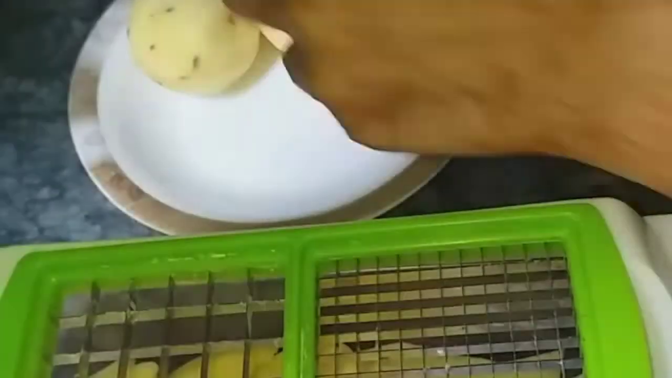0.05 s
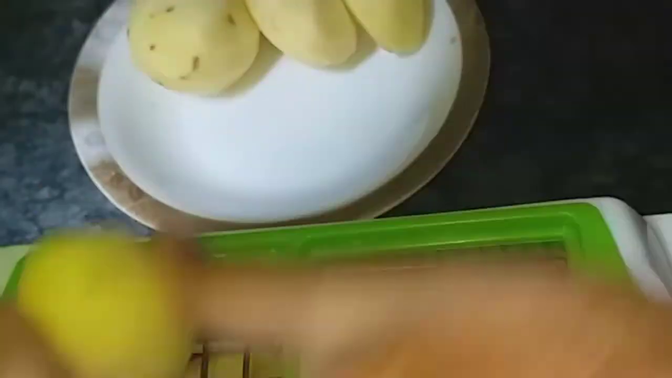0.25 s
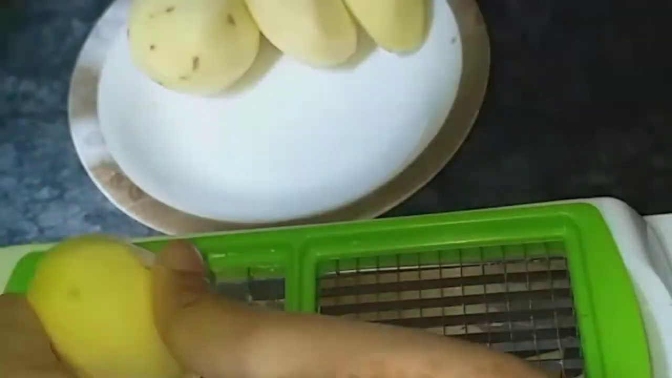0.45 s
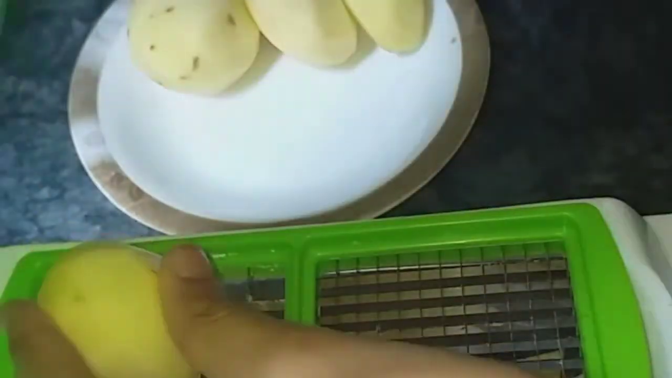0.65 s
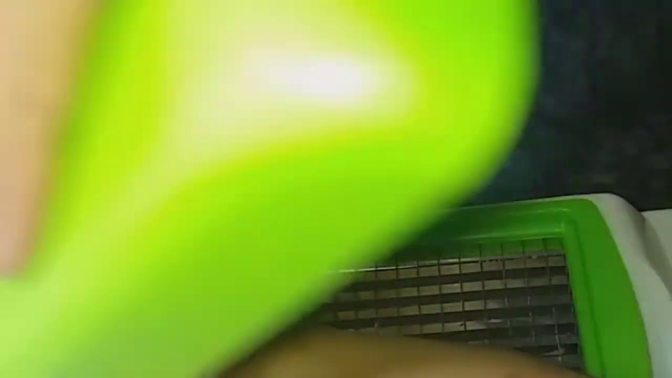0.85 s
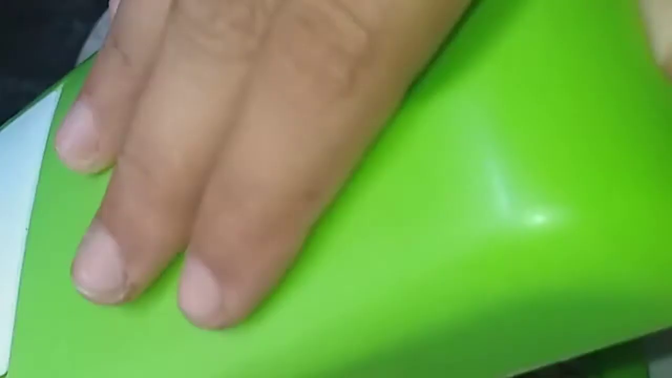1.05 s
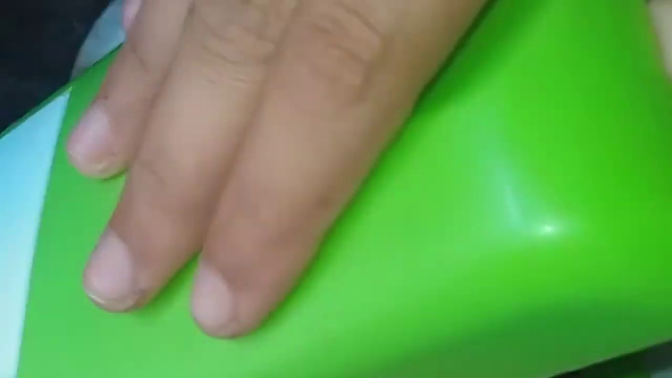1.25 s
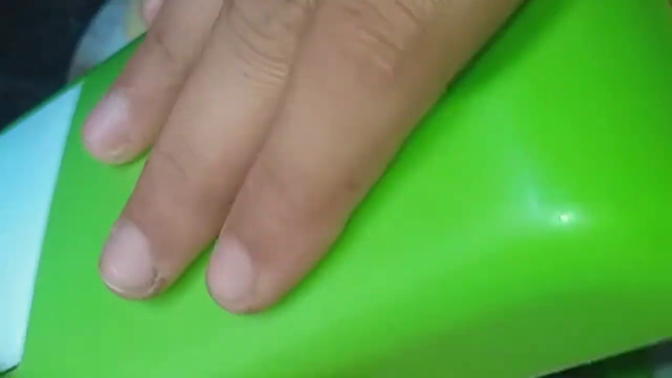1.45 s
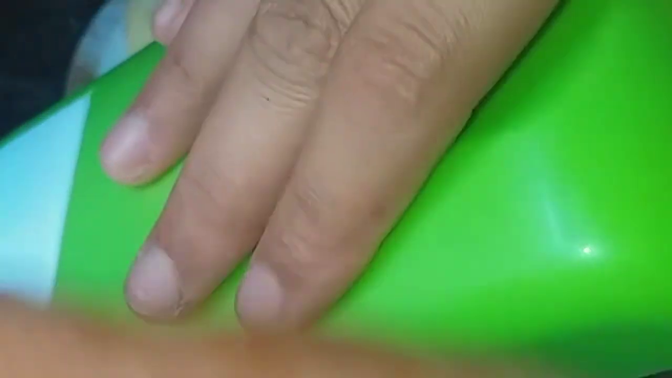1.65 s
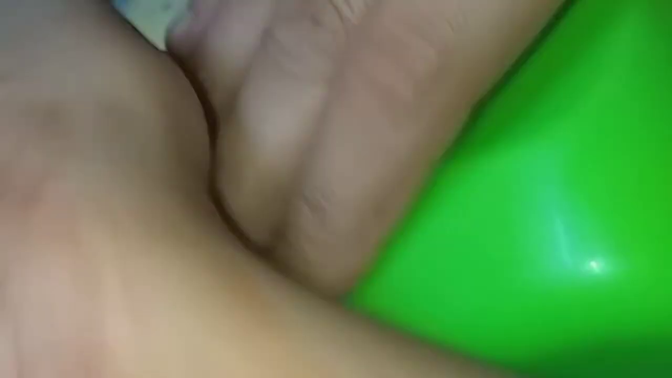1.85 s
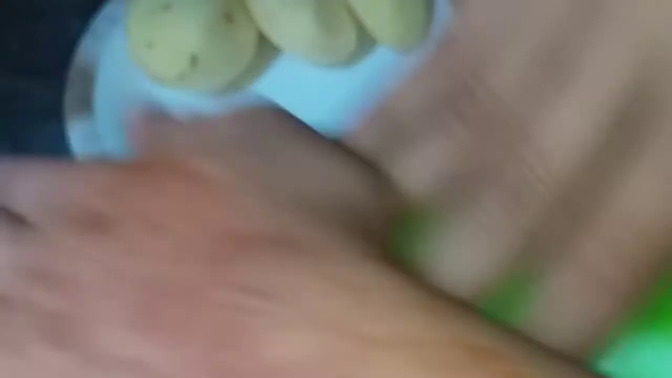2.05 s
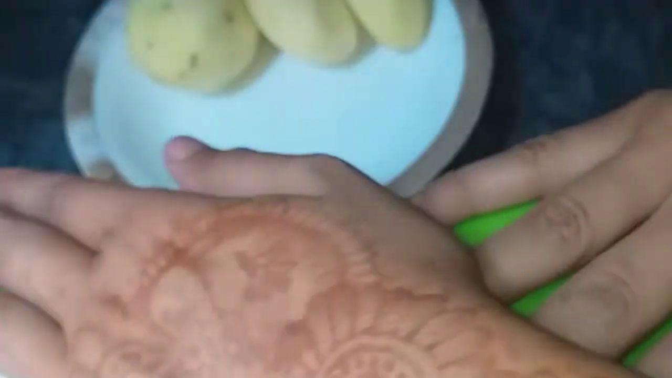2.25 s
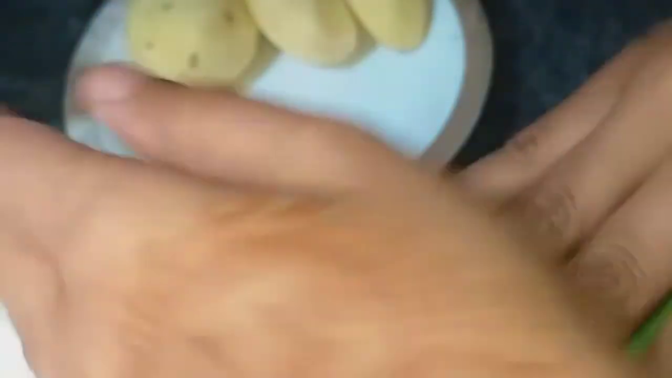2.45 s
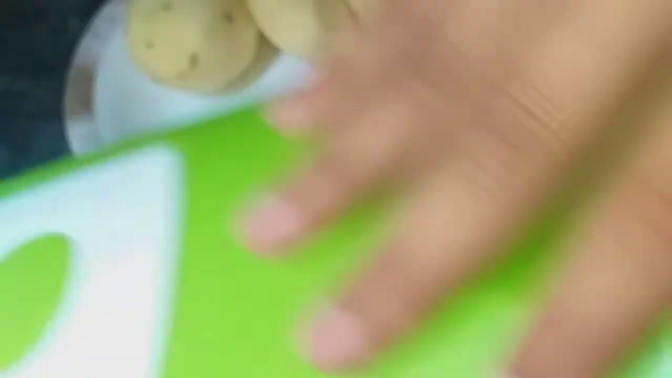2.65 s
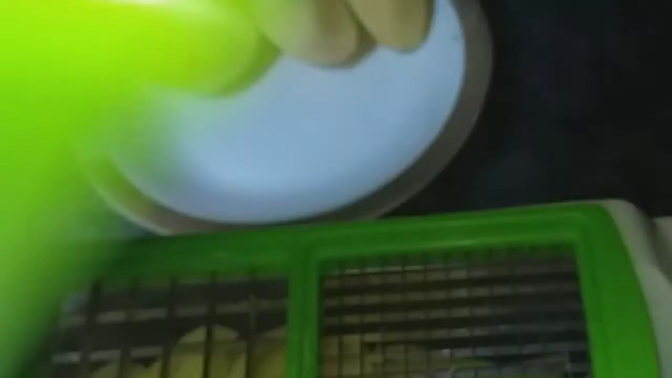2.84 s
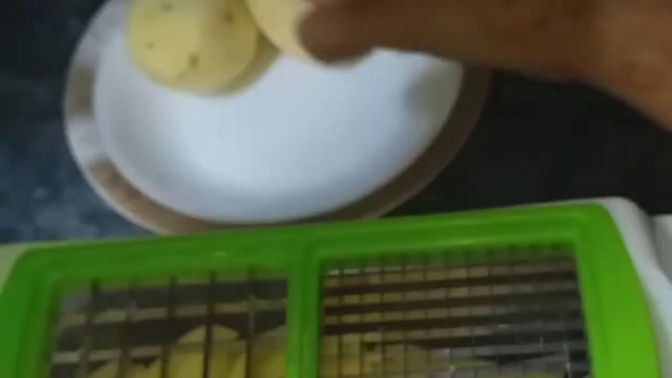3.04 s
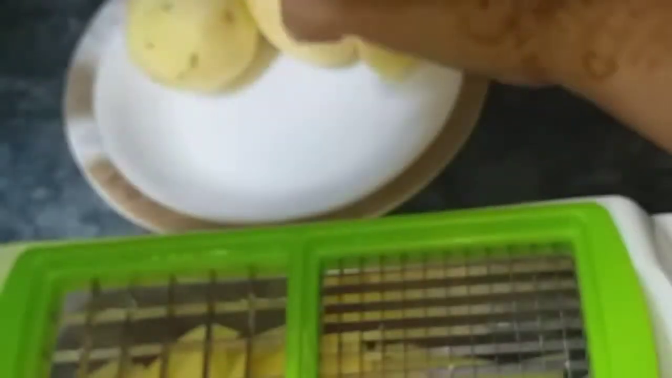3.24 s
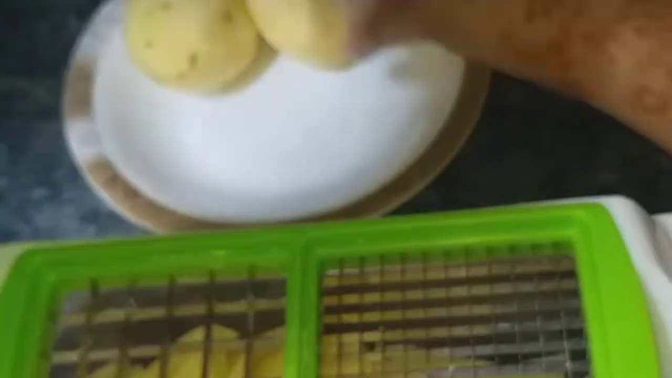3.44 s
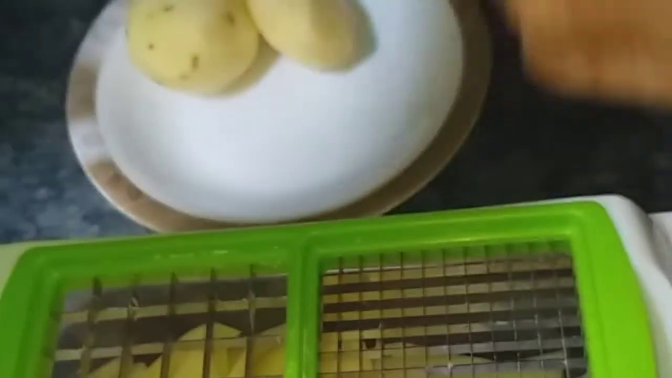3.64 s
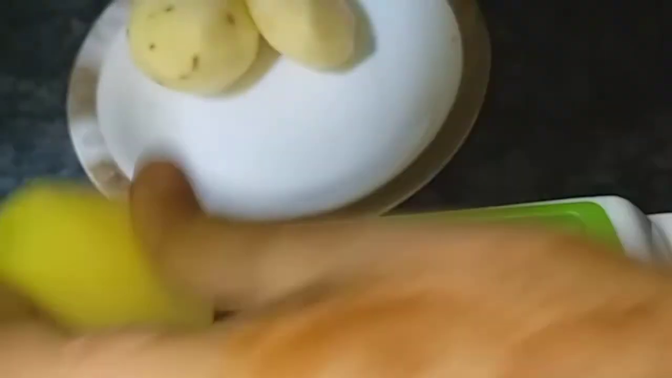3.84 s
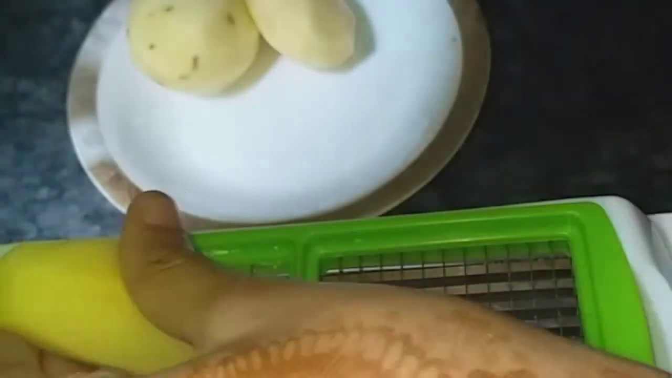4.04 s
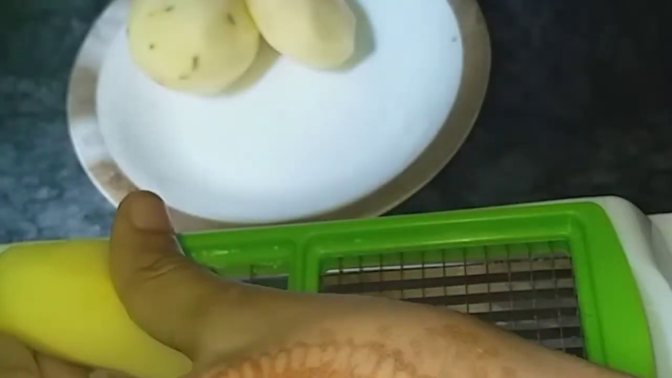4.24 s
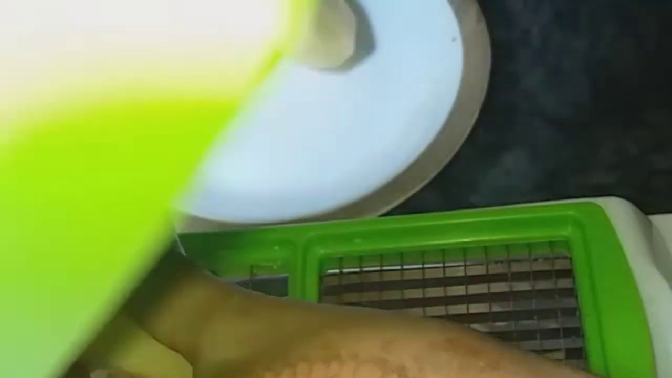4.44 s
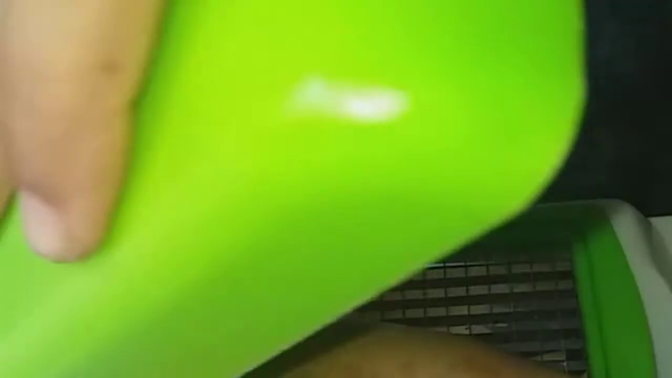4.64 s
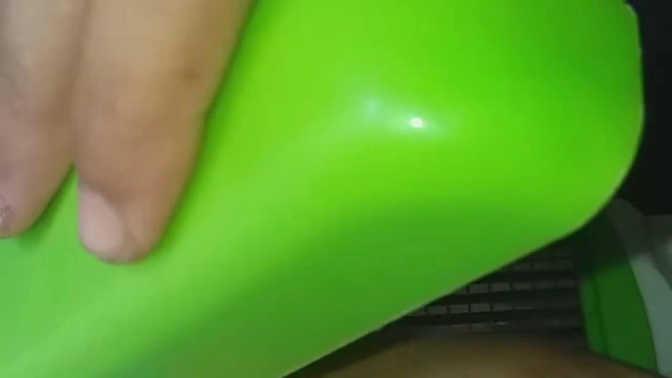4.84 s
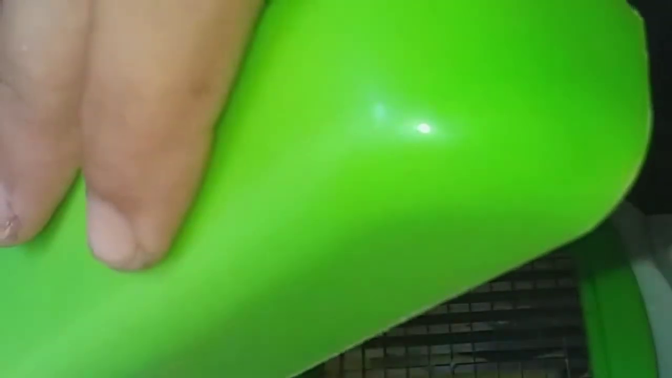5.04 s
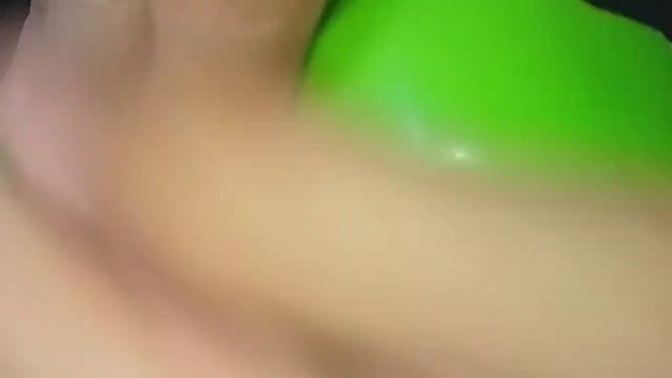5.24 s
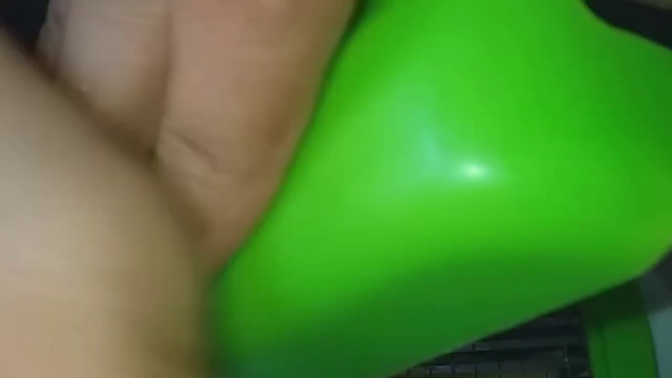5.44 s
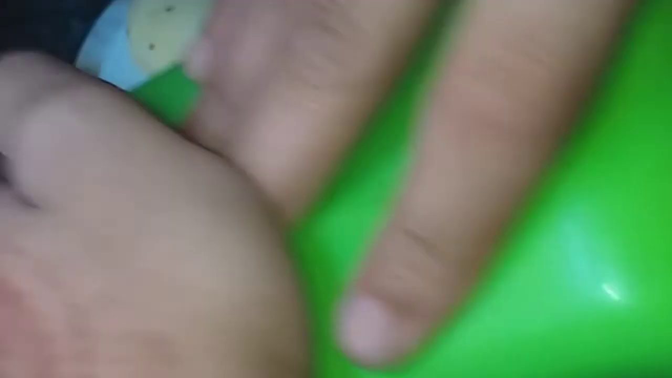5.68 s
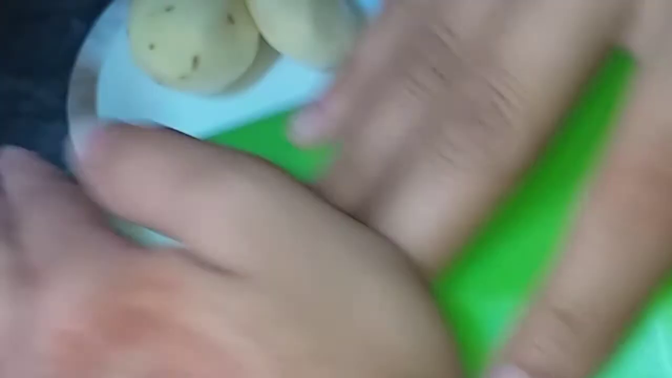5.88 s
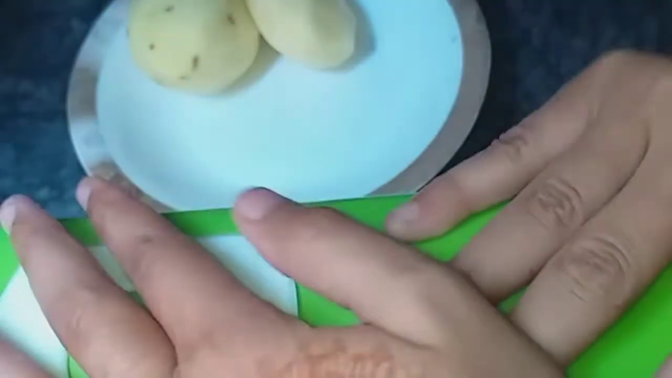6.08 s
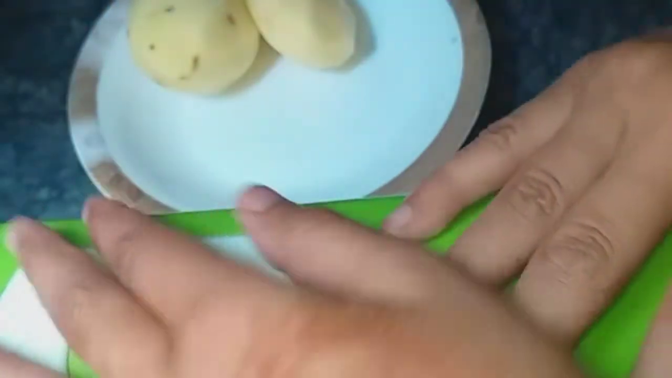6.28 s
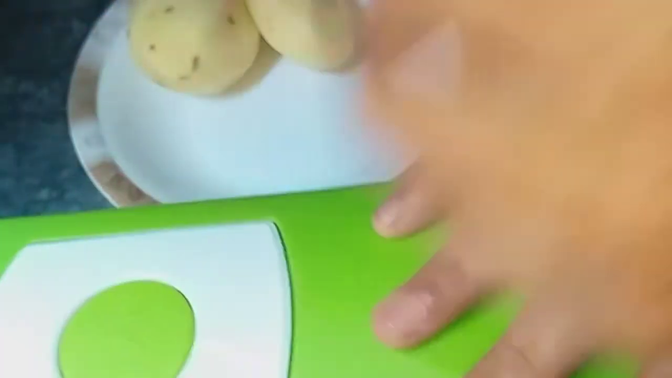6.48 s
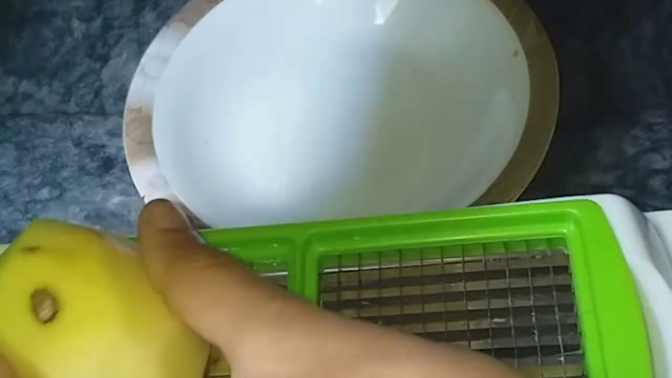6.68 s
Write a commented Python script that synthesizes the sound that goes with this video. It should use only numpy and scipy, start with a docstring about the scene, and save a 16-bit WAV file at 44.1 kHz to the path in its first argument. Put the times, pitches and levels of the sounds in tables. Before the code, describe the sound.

Close in a small, slightly echoing kitchen, quiet fan air with an unsteady low hum runs throughout, while a distant flock of small birds chatters and single chirps stand out. A tiny snap comes at 0.2 s, soft finger rubs and a faint tap before 0.6, then a clear plastic knock at 1.0 and light rattles to 1.6. From 1.9 to 2.15 s flesh tears with a gritty scrape, faint wet squeal and quick metallic twangs, ending in a loud hollow plastic slam with a short ring. Small clicks follow near 2.5, and the background sinks. Birds and hum fill 3 to 5.4 s, with a bright chirp at 5.4. At 5.53 a very sharp crack and low palm thump start a slower, faint crunch, with a snap at 5.66; the lid clacks shut hard at 6.03. Birds remain, and the fan drops at 6.54.

```python
"""Vegetable dicer and birds

On a kitchen counter the lid of a plastic dicer is laid on a potato, pressed through the blade grid and slams
shut, twice. Blows excite the resonances of lid and box, and cutting is a train of stick-slip impulses.
A fan hums (filtered noise), small birds chatter beyond a window (frequency-modulated tones), and the
background sinks after each slam."""
import sys
import numpy as np
from scipy import signal
from scipy.fft import rfft, irfft, next_fast_len
from scipy.io import wavfile
from scipy.ndimage import uniform_filter1d, minimum_filter1d, map_coordinates

SR = 44100
rng = np.random.default_rng(int(sys.argv[2]) if len(sys.argv) > 2 else 0)


def master(y):
    """Save y as 16-bit WAV."""
    cut = np.clip(np.atleast_2d(y).T, -1, 1)
    pcm = np.round(cut * 32767)  # scale
    wavfile.write(sys.argv[1], SR, pcm.astype(np.int16))


N = 295911
T = np.arange(N) / SR  # time in seconds

# moments at which the lid slams shut: start_s
SLAM_TIMES = (2.1515, 6.0306)
# modes of the shut lid on the box: pitch_hz, t60_s, first_slam_level_db, second_slam_level_db
LID_MODES = [(260, .1, -20.5, -19.5), (321, .09, -21.5, -17.5), (392.8, .13, -10.5, -34.5),
             (500, .13, -18, -30.5), (630.3, .09, -18.5, -22.5), (831, 0.098, -23, -20.5),
             (1554, 0.077, -19.5, -30), (2060, 0.1, -16, -32.5), (2580, .1, -23, -18)]
# the palm lands on the lid
PALM_START_S, PALM_DB, PALM_HZ, PALM_T60_S = 5.532, -24, 120, 0.027
# blades through the flesh, one list per press: time_s, groan_level_db, pressure_0_to_1, scrape_over_groan_db
CUTS = [
    [(1.955, -44, 0.12, -12.5), (2.0, -56.5, 0.04, -5.5), (2.035, -50.5, 0.06, 0), (2.065, -41, 0.07, -4),
     (2.085, -45.5, 0.23, 4), (2.11, -41, 0.16, 4.5), (2.145, -39.5, 0.3, 2)],
    [(5.545, -44, 0.02, -17.5), (5.62, -58.5, 0, -21.5), (5.66, -48.5, 0.2, -12), (5.71, -49, 0.8, -11.5),
     (5.785, -53, 0.23, -20), (5.81, -60, 0.4, -17.5), (5.88, -50.5, 0.8, -9), (5.96, -46.5, 0.7, 2),
     (6.022, -45.5, 0.67, -2.5)],
]
# wet blade squeal: time_s, level_db, pitch_hz
SQUEAL = [(1.96, -65, 4700), (1.99, -59.5, 5130), (2.03, -62, 5480), (2.09, -58.5, 5420), (2.13, -62, 5270)]
# forward jumps of the blade grid: start_s, level_db
GRID_JERKS = [(2.037, -29), (2.051, -34.5), (2.068, -33), (2.083, -24.5), (2.099, -28)]
GRID_HZ, GRID_T60_S, JERK_RISE_S = 1856, 0.045, 0.0015
# lid and box contacts: start_s, level_db, best_driven_pitch_hz, fall_off_db_per_octave_squared (sign ignored),
# rattle_t60_s
KNOCKS = [(.588, -57, 560, 9, 0.089), (1.044, -38.5, 800, 0, 0.067), (1.341, -55.5, 488, 27, 0.067),
          (1.375, -52.5, 428.5, 9, 0.035), (1.454, -53, 500, 10, 0.063), (1.639, -45.5, 1820, 0, 0.21),
          (1.931, -39.5, 539, 9.5, 0.045), (2.15, -13.5, 1200, 0.4, 0.15), (2.152, -15, 1810, 4.5, 0.081),
          (2.371, -52, 1470, -0.5, 0.028), (2.472, -45, 1970, 16, 0.025), (2.486, -38, 2140, 4, 0.029),
          (2.939, -65, 621, 8, 0.048), (3.296, -62, 651, 8.5, 0.029), (3.422, -51, 1199, 6.5, 0.065),
          (4.69, -52, 791.7, 6.5, 0.1), (6.03, -17.5, 1150, 2.5, 0.06), (6.0308, -15, 2810, 6.5, 0.031)]
# body modes of the box: pitch_hz, width_hz, level_db
BOX_MODES = [(129, 24, -3), (318, 68, 1), (402.7, 57, 1), (508, 70, 0.5), (686, 90, -4), (813, 120, -6),
             (1090, 260, -11.5), (1533, 300, -8.5), (1976, 300, -5), (2690, 440, -4.5), (2980, 330, -3.5),
             (3380, 880, -9.5), (6800, 4000, -27.5), (13000, 3000, -21.5)]
# dry snaps and bright cracks, including the treble crack of each slam: start_s, strength_db,
# low_part_over_strength_db
SNAPS = [(0.2305, -29.5, -9), (2.1509, -9.5, 2.5), (2.4873, -39, 6), (5.4987, -31.5, -5.5),
         (5.5106, -32, 1), (5.5312, -1, 0), (5.537, -11, 0), (5.567, -35.5, -2), (5.661, -16, 2),
         (5.6781, -37.5, -0.5), (6.0331, -9, 5.5)]
# resonances of a snap, the first two forming its low part: pitch_hz, width_hz, level_db
SNAP_MODES = [(1097, 1800, -5), (2720, 2100, 2.5), (5870, 300, 2), (7040, 1900, -13.5), (13700, 3000, -10)]
# fingers brush plastic: start_s, length_s, level_db, high_over_low_db
RUBS = [(-.03, 0.065, -46.5, 3), (0.346, 0.086, -63, -10), (0.47, 0.15, -64.5, -9),
        (1.392, 0.094, -59.5, -6), (1.544, 0.11, -53, -2), (5.463, .02, -54.5, -2.5)]
# spectrum of a rub: pitch_hz, relative_level_db_per_hz
RUB_SPECTRUM = [(2500, 4.5), (5200, 7.5), (5900, 16), (6500, 7.5), (8500, -3), (13000, -5), (16000, -3.5)]
# single clear chirps: start_s, length_s, start_pitch_hz, end_pitch_hz, level_db, hoarseness_hz
CHIRPS = [(0.447, 0.069, 3940, 3940, -49.5, 14), (0.773, 0.045, 3390, 3300, -49.5, 37),
          (1.296, 0.12, 2850, 2820, -48.5, 98), (2.408, 0.075, 3400, 3300, -55.5, 71),
          (4.118, 0.045, 3050, 3087, -51, 40), (4.2, 0.054, 4050, 4150, -53, 69),
          (4.448, 0.09, 4350, 4250, -52, 70), (4.5, .11, 3900, 2900, -55, 100),
          (5.102, 0.13, 3800, 2480, -51.5, 330), (5.305, 0.047, 1900, 1908, -48.5, 55),
          (5.408, 0.053, 3850, 3813, -37.5, 36), (5.821, 0.028, 3030, 2900, -51.5, 38),
          (6.345, 0.041, 3000, 2946, -47, 35)]
# outbursts of the far flock: start_s, length_s, level_db, start_pitch_hz, end_pitch_hz
OUTBURSTS = [(-.03, 0.097, -54, 2750, 2732), (.26, 0.055, -54.5, 2989, 3298),
             (0.339, 0.087, -48, 3404, 2910), (.47, 0.18, -49.5, 3675, 2787),
             (0.898, 0.096, -55, 3123, 3118), (1.06, 0.1, -54, 2917, 2891), (1.22, .13, -51, 3602, 3796),
             (1.32, 0.14, -53, 2897, 3024), (1.498, 0.22, -55.5, 2996, 2887),
             (1.761, 0.12, -54, 2930, 2889), (2.242, 0.076, -51.5, 3610, 3391),
             (2.88, 0.12, -60, 2910, 2853), (3.321, 0.092, -55, 2927, 2908),
             (3.579, 0.13, -55.5, 3182, 3104), (3.799, 0.1, -54.5, 2892, 2642),
             (3.929, 0.17, -52.5, 3498, 2997), (4.067, 0.26, -50.5, 3540, 3594),
             (4.445, 0.17, -53.5, 4230, 3106), (4.924, 0.11, -59.5, 3104, 3007),
             (5.103, 0.24, -51.5, 3395, 2882), (5.351, .17, -47.5, 3280, 3550),
             (5.598, 0.059, -57, 3316, 3088), (5.676, 0.11, -59, 3270, 3012),
             (6.138, 0.089, -62, 3530, 3320), (6.378, 0.13, -55.5, 3300, 3010)]
# busier moments of the low register: start_s, length_s, level_db
LOW_SWELLS = [(1.5, 0.75, -58), (3.55, 0.37, -63.5), (4.1, 0.32, -59), (4.55, 0.338, -58.5),
              (5.12, 0.33, -59.5)]
SWELL_ATTACK_S, SWELL_RELEASE_S = 0.017, 0.033
# steady chatter of the two registers, levels in dB over the background
FLOCK_DB, FLOCK_HZ, LOW_FLOCK_DB, LOW_FLOCK_HZ = -2.5, 2952, -2, 1976
# level of fan air, before the sudden change: time_s, level_db
BACKGROUND_LEVEL = [(0, -56.5), (.9, -60), (1.9, -56.5), (2.15, -47), (2.3, -64.5), (2.65, -64.5),
                    (3.16, -69), (3.22, -63), (3.48, -59.5), (4.2, -58), (5.1, -61.5), (5.6, -56),
                    (6.03, -67), (6.5, -65)]
# sudden change of the background: start_s, fan_and_low_chatter_change_db, high_chatter_change_db
HUSH = (6.543, -12, 0.6)
HUSH_S, FAN_HUSH_DB, HIGH_HUSH_DB = HUSH
# spectrum of moving air: pitch_hz, relative_level_db_per_hz
AIR_SPECTRUM = [(20, -30.5), (70, -3.5), (190, -5.5), (263, -4), (335, -9.5), (560, -10.5), (680, -17.5),
                (820, -15), (1230, -19.5), (3100, -12.5), (3900, -21.5), (5140, -28.5), (11300, -31.5),
                (16000, -38)]
# swells and dips of the low hum, before the sudden change: time_s, level_db
HUM_LEVEL = [(0, -59), (.9, -62.5), (1.53, -55.5), (2.3, -60), (3.17, -67), (3.32, -56.5), (3.97, -54),
             (4.14, -59.5), (4.63, -58.5), (4.72, -73), (4.85, -50), (4.96, -68), (5.02, -54.5),
             (5.85, -59), (6.19, -71.5), (6.27, -52.5), (6.32, -72), (6.38, -55), (6.6, -71.5)]
HUM_HZ, HUM_WIDTH_HZ = 251.7, 17  # the width is that of one of two passes
# thin upper tone of the fan: pitch_hz, width_hz (of one of two passes), level_over_air_db
WHINE = (822, 11, -16.5)
# reverberation of the kitchen: pitch_hz, t60_s (before any stretch)
KITCHEN_T60 = [(100, 0.64), (400, 0.26), (900, 0.27), (2000, 0.22), (5000, 0.15), (14000, 0.32)]
TOP_HZ = 16400  # band limit


def lid_ring():
    """Modal ringing: each slam sets damped sines going, their levels slightly unsteady."""
    ringing = np.zeros(N)
    t = T[:SR // 3]
    for hz, t60, *levels_db in LID_MODES:
        shake = unit(amp(2.5 * wobble(130)))
        for s, db in zip(SLAM_TIMES, levels_db):
            start = round(s * SR)
            envelope = amp(db - 60 * t / t60) * shake[start:start + len(t)]
            ringing[start:start + len(t)] += envelope * np.sin(2 * np.pi * hz * t)
    return ringing


def palm():
    """Impact on a damped resonance: the palm gives one low, decaying note."""
    envelope = amp(PALM_DB - 60 * np.abs(T - PALM_START_S) / PALM_T60_S) * (T > PALM_START_S)
    return envelope * np.sin(2 * np.pi * PALM_HZ * (T - PALM_START_S))


def thuds():
    """High-pass radiation: palm and lid lose their slowest motion, then the room answers."""
    boom = filtered(palm() + lid_ring(), lambda f: (f / (f - 80j)) ** 2)
    return boom + amp(-13.0) * echo(boom)[:N]


def cutting():
    """Stick-slip friction: flesh tears in tiny slips; the box groans, the grid scrapes, a wet blade squeals."""
    out = np.zeros(N)
    tear = slips(rate=1800, spread_db=1.5) * amp(2.6 * wobble(60))
    dull = unit(filtered(tear, lambda f: mode(f, 540, 98) * mode(f, 520, 400)))
    tight = unit(filtered(tear, lambda f: mode(f, 670, 200) * mode(f, 820, 500)))
    scratches = slips(rate=5000, spread_db=-2.5) * amp(2.9 * wobble(90))
    scrape = unit(filtered(scratches, grid_response))
    for rows in CUTS:
        db, pressure, scrape_db = curves(rows)
        # pressure stiffens the lid and lifts its groan
        groan = np.sqrt(1 - pressure) * dull + np.sqrt(pressure) * tight
        out += within(rows) * amp(db) * (groan + amp(scrape_db) * scrape)
    db, hz = curves(SQUEAL)
    out += within(SQUEAL) * amp(db + 3 * wobble(180)) * warble(hz, rough_hz=190, rate=700)
    out += jerks()
    return out + amp(-8.5) * echo(out)[:N]


def slips(rate, spread_db):
    """Stick-slip: impulses of random time, size and sign, on average rate a second."""
    chance, size, sign = rng.random(N), rng.exponential(1, N), rng.standard_normal(N)
    return (chance < rate / SR) * np.sign(sign) * amp(spread_db * size)


def grid_response(f):
    """Coupled resonances: two opposed modes in a broad one, with a faint high mode."""
    body = (mode(f, 2050, 600) - 0.7 * mode(f, 3100, 1000)) * mode(f, 2300, 3000)
    return body + 0.015 * mode(f, 12500, 5000)


def jerks():
    """Free vibration: each jump rings the blade grid on two partials, slightly detuned each time."""
    out = np.zeros(N)
    t = T[:SR // 10]
    detunings = rng.standard_normal((len(GRID_JERKS), 2))
    for (s, db), (detune, upper_detune) in zip(GRID_JERKS, detunings):
        ring = np.sin(2 * np.pi * GRID_HZ * (1 + 0.018 * detune) * t)
        ring += 0.27 * np.sin(2 * np.pi * 1.1 * GRID_HZ * (1 + 0.014 * upper_detune) * t)
        envelope = amp(db - 60 * t / GRID_T60_S) * (1 - np.exp(-t / JERK_RISE_S))
        out[round(s * SR):][:len(t)] += envelope * ring
    return out


def knocks():
    """Forced vibration: each contact drives the box modes with a blow and a short rattle; the room answers."""
    out = np.zeros(N + 2 * SR)
    t = T[:SR // 4]
    for s, db, best_hz, fall_db, t60 in KNOCKS:
        rattle = rng.standard_normal(len(t)) * amp(-60 * t / t60)
        # loose parts clatter unevenly
        clatter_db = 2 * rng.standard_normal(len(t) // 100 + 1)
        rattle *= amp(np.repeat(clatter_db, repeats=100)[:len(t)])
        rattle[0] += 12  # the first blow
        ring = filtered(rattle, box_response(best_hz, fall_db))
        ring *= amp(db) / np.sqrt(np.mean(ring[:SR // 70] ** 2))  # level of the opening
        wet = amp(-9) * echo(ring)
        out[round(s * SR):][:len(ring)] += ring
        out[round(s * SR) + SR // 200:][:len(wet)] += wet  # 5 ms later
    return out[:N]


def box_response(best_hz, fall_db):
    """Modal superposition: modes far from the best-driven pitch respond less, with random strengths."""
    strengths = amp(rng.normal(0, 0.27, len(BOX_MODES)))
    drive_width = best_hz * 8 / (3.5 + fall_db ** 2 / 6)

    def response(f):
        total = 0
        for k, (strength, (hz, width, level)) in enumerate(zip(strengths, BOX_MODES)):
            driven = amp(-abs(fall_db) * np.log2(hz / best_hz) ** 2)
            total = total + (-1) ** k * strength * amp(level) * driven * mode(f, hz, width)
        return f / (f - 60j) * mode(f, best_hz, drive_width) * total
    return response


def snaps():
    """Sharp cracks: millisecond noise cracks excite resonances with a faint high ring, close to the microphone."""
    high, low = np.zeros(N), np.zeros(N)
    t = T[:SR // 50]
    for s, db, low_db in SNAPS:
        crack = rng.standard_normal(len(t)) * (0.4 * amp(-60 * t / 0.003) + amp(-19.0 - 60 * t / 0.015))
        crack[0] += 1.5
        high[round(s * SR):][:len(t)] += amp(db) * crack
        low[round(s * SR):][:len(t)] += amp(db + low_db) * crack

    def colour(modes):
        return lambda f: sum(amp(db) * mode(f, hz, width) for hz, width, db in modes)

    dry = filtered(low, colour(SNAP_MODES[:2])) + filtered(high, colour(SNAP_MODES[2:]))
    return dry + amp(-33.0) * echo(dry)[:N]


def rubs():
    """Friction noise: short grainy swishes in two bands; a dull one loses its top."""
    grain = unit(amp(2.7 * wobble(150)))
    # the bands part at 7 kHz
    low = noise(lambda f: amp(along(RUB_SPECTRUM, f)) / (1 + (f / 7000) ** 6))
    high = noise(lambda f: amp(along(RUB_SPECTRUM, f)) / (1 + (7000 / (f + 1)) ** 6))
    out = np.zeros(N)
    for s, length, db, bright_db in RUBS:
        stroke = np.sin(np.pi * np.clip((T - s) / length, 0, 1)) ** 2
        out += amp(db) * stroke * (low + amp(bright_db) * high)
    return grain * out


def birds():
    """Superposed voices: a far flock chatters in two registers and bursts out in slides; a few chirps stand out."""
    latest = np.searchsorted(np.transpose(OUTBURSTS)[0], T) - 1
    s, length, _, start_hz, end_hz = np.transpose(OUTBURSTS)[:, latest]
    hz = start_hz + (end_hz - start_hz) * np.clip((T - s) / length, 0, 1)
    steady = amp(FLOCK_DB + 2.6 * wobble(9.3)) * background(HIGH_HUSH_DB)
    low_steady = amp(LOW_FLOCK_DB + 3.5 * wobble(7)) * background(FAN_HUSH_DB)
    low = np.sqrt(low_steady ** 2 + swells(LOW_SWELLS))  # powers add
    out = np.sqrt(swells(OUTBURSTS)) * crowd(hz, spread=0.22, count=8)
    out += steady * crowd(FLOCK_HZ, spread=0.26, count=6)
    out += low * crowd(LOW_FLOCK_HZ, spread=0.18, count=6)
    return out + chirps()


def chirps():
    """Frequency glides: single whistles slide between two pitches under a fluttering arch."""
    out = np.zeros(N)
    flutter = unit(amp(3.4 * wobble(220)))
    for s, length, start_hz, end_hz, level_db, hoarse_hz in CHIRPS:
        u = np.clip((T - s) / length, 0, 1)
        arch = np.abs(np.sin(np.pi * u ** 0.8))
        out += amp(level_db) * flutter * arch * whistle(start_hz + (end_hz - start_hz) * u, hoarse_hz)
    return out


def whistle(hz, rough_hz):
    """Harmonic series: a bird voice of randomly modulated pitch with two weak overtones."""
    phase = 2 * np.pi * np.cumsum(hz + rough_hz * wobble(300)) / SR
    return np.sin(phase) + amp(-23.0) * np.sin(2 * phase) + amp(-27.5) * np.sin(3 * phase)


def crowd(hz, spread, count):
    """Diffuse reflection: cheeps around a common pitch are smeared by walls into an even chatter."""
    voices = np.zeros(N)
    for place in np.linspace(-1, 1, count):
        pitch = hz * (1 + spread * place + 0.05 * wobble(12))
        voices += amp(4.1 * wobble(28) - 8 * place ** 2) * whistle(pitch, rough_hz=236.7)
    voices = unit(voices)
    smeared = np.pad(amp(-6.5) * voices, (0, 2 * SR))
    step = SR // 5  # each fifth of a second gets its own echo, so the chatter keeps no fixed colour
    for start in range(0, N, step):
        tail = echo(voices[start:start + step], stretch=0.34)
        smeared[start:start + len(tail)] += tail
    smeared = smeared[:N]
    power = np.abs(uniform_filter1d(smeared ** 2, size=3000))
    return unit(smeared / np.sqrt(power + 1e-6))


def swells(rows):
    """Energy envelope: power of events that start quickly, hold and die away."""
    power = np.zeros(N)
    for s, length, db, *_ in rows:
        rise = np.clip((T - s) / SWELL_ATTACK_S, 0, 1) ** 2
        past_hold = np.maximum(T - s - length + SWELL_RELEASE_S, 0)
        power += amp(2 * db) * rise * np.exp(-past_hold * 2 / SWELL_RELEASE_S)
    return power


def fan():
    """Broadband flow noise with narrow-band tones: moving air and unsteady motor tones."""
    air = noise(lambda f: amp(along(AIR_SPECTRUM, f)) * f ** 2 / (f ** 2 + 45 ** 2))
    air = air * amp(1.8 * wobble(6.6))
    hz, width, db = WHINE
    whine = amp(db + 2.5 * wobble(14)) * noise(lambda f: mode(f, hz, width) ** 2)
    beating = noise(lambda f: mode(f, HUM_HZ, HUM_WIDTH_HZ) ** 2)
    # even out slow changes, so that it flutters fast around its level
    beating /= np.sqrt(np.abs(uniform_filter1d(beating ** 2, size=SR // 6)) + 1e-6)
    hum = amp(curves(HUM_LEVEL)[0] + FAN_HUSH_DB * (T > HUSH_S)) * beating
    return background(FAN_HUSH_DB) * (air + whine) + hum


def background(hush_db):
    """Common gain: level of the air and steady chatter, changing at once by hush_db."""
    return amp(curves(BACKGROUND_LEVEL)[0] + hush_db * (T > HUSH_S))


def echo(x, stretch=1):
    """Reverberation: a diffuse noise tail in which each frequency dies at its own speed."""
    hz, t, z = signal.stft(rng.standard_normal(SR), SR, nperseg=256)
    t60 = stretch * along(KITCHEN_T60, hz)[:, None]
    tail = signal.istft(z * amp(-60 * t / t60), SR, nperseg=256)[1]
    return signal.fftconvolve(x, tail / np.linalg.norm(tail))


def mode(f, hz, width):
    """Damped oscillator: the complex response of one causal resonance."""
    return 1j * f * width / (hz * hz - f * f + 1j * f * width)


def filtered(x, response):
    """Linear filtering: the spectrum of x times a complex response of frequency."""
    m = next_fast_len(len(x) + SR // 2)
    return irfft(rfft(x, m) * response(np.fft.rfftfreq(m, 1 / SR)), m)[:len(x)]


def noise(response):
    """Coloured noise: white noise through a response, at rms 1."""
    return unit(filtered(rng.standard_normal(N), response))


def warble(hz, rough_hz, rate):
    """Frequency modulation: a tone whose pitch shivers at random."""
    return np.sqrt(2) * np.sin(2 * np.pi * np.cumsum(hz + rough_hz * wobble(rate)) / SR)


def wobble(rate):
    """Band-limited fluctuation: a smooth random curve with rate knots a second."""
    return map_coordinates(rng.standard_normal(int(N * rate / SR) + 4), [T * rate])


def within(rows):
    """Gating: 1 between the first and the last row, with soft edges."""
    return uniform_filter1d(1.0 * (T > rows[0][0]) * (T < rows[-1][0] + 0.008), size=300)


def curves(rows):
    """Linear interpolation in time: one curve for each column after the first."""
    s, *columns = np.transpose(rows)
    return [np.interp(T, s, column) for column in columns]


def along(points, hz):
    """Interpolation of (pitch_hz, value) points on a logarithmic frequency axis."""
    f, v = np.transpose(points)
    return np.interp(np.log(hz + 1), np.log(f + 1), v)


def amp(db):
    """Level definition: decibels to amplitude gain."""
    return 10 ** (np.asarray(db) / 20)


def unit(x):
    """Normalisation: x scaled to rms 1."""
    return x / np.sqrt(np.mean(x ** 2) + 1e-20)


def scene():
    """Superposition: all sources add at one microphone."""
    return (fan() + birds() + knocks() + thuds() + snaps() + cutting() + rubs())[None]


def record(dry):
    """Limiting: gain dips for some milliseconds around peaks near full scale; then the band is limited."""
    needed = np.minimum(1, 0.97 / (np.abs(dry[0]) + 1e-9))
    gain = uniform_filter1d(minimum_filter1d(needed, size=241), size=121)
    return filtered(dry[0] * gain, lambda f: f < TOP_HZ)[None]


dry = scene()
out = record(dry)
master(out)
```